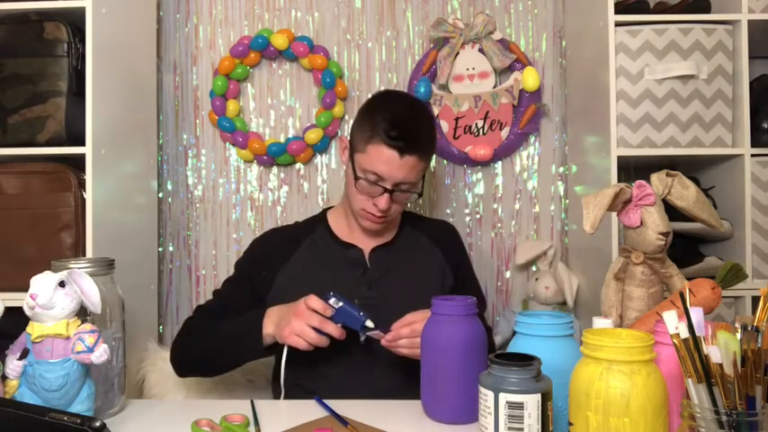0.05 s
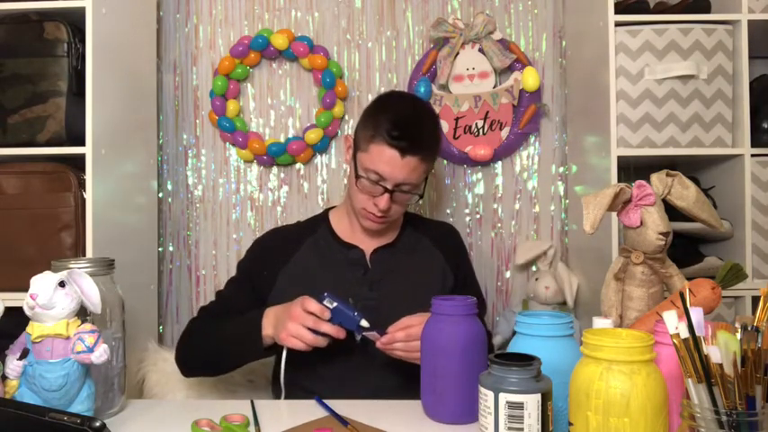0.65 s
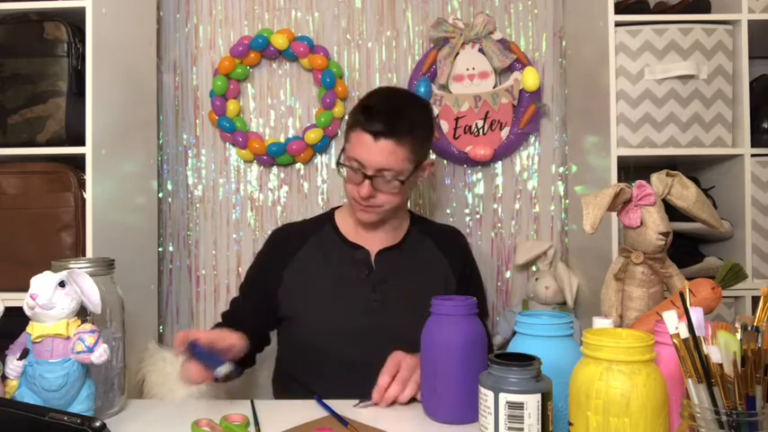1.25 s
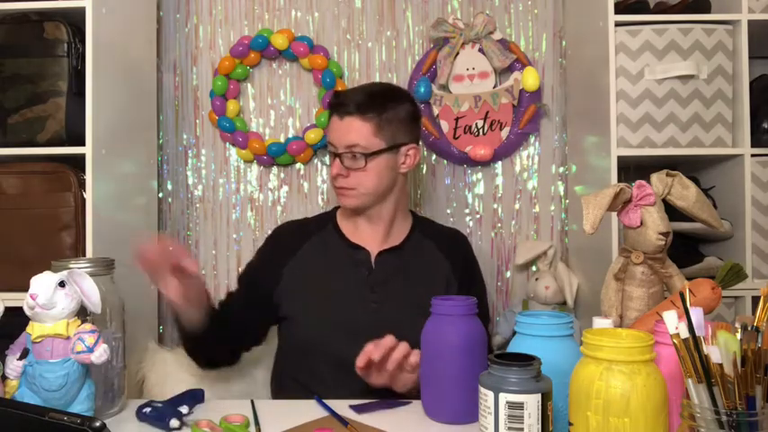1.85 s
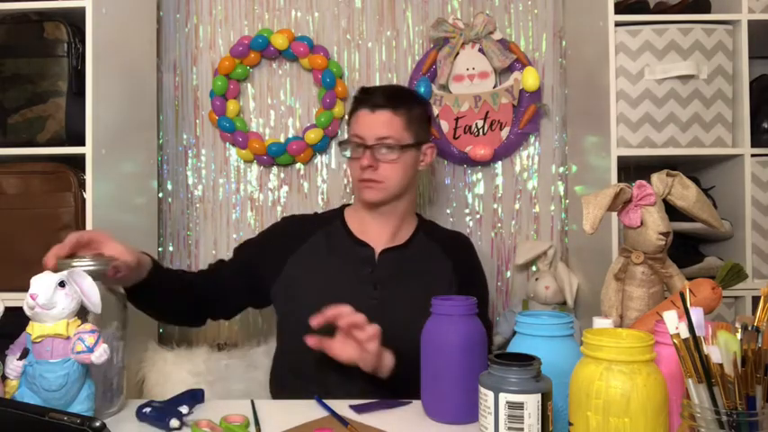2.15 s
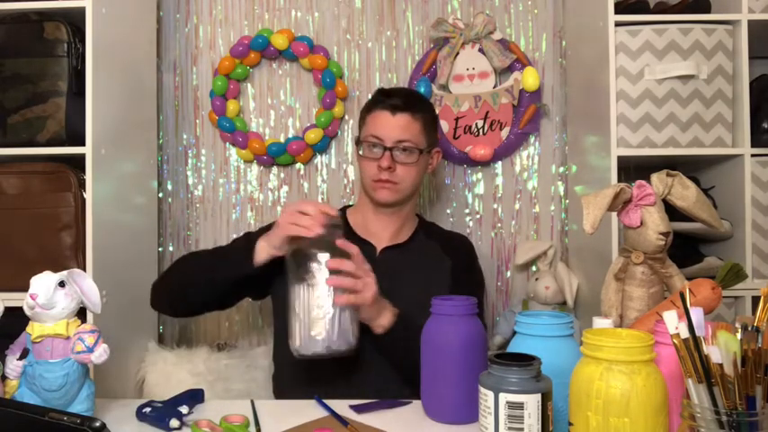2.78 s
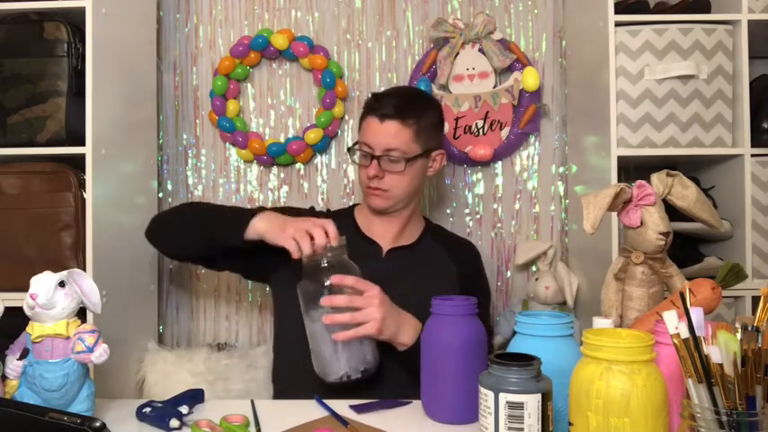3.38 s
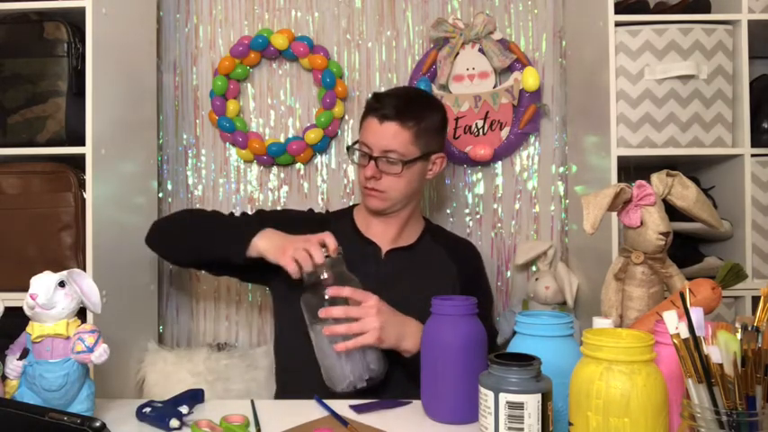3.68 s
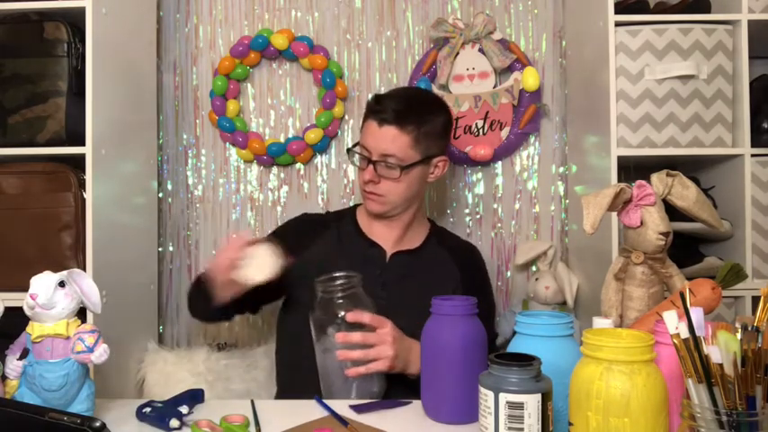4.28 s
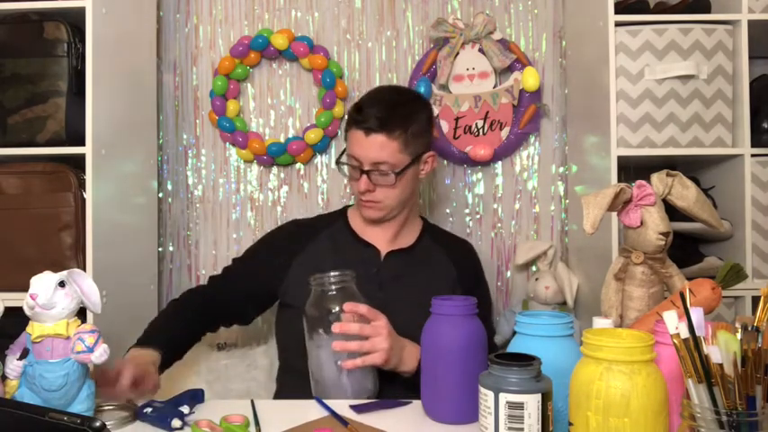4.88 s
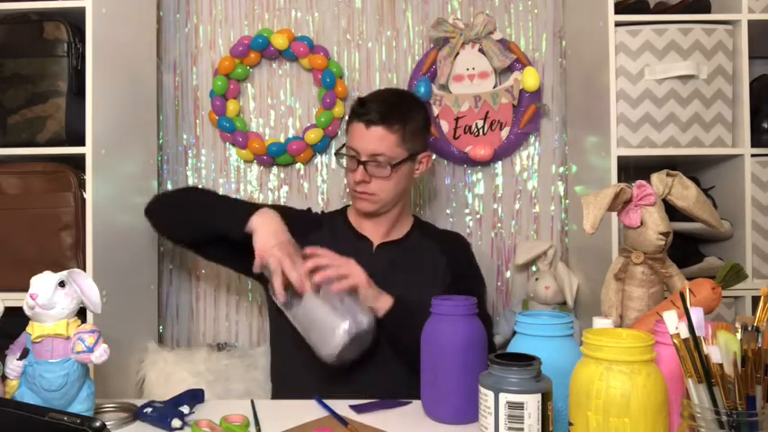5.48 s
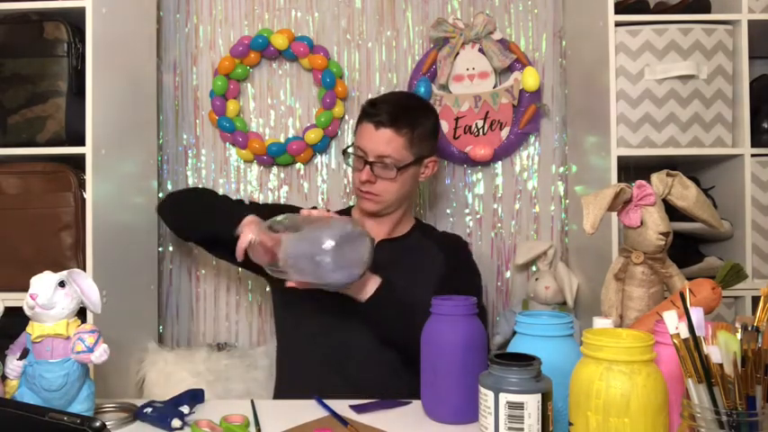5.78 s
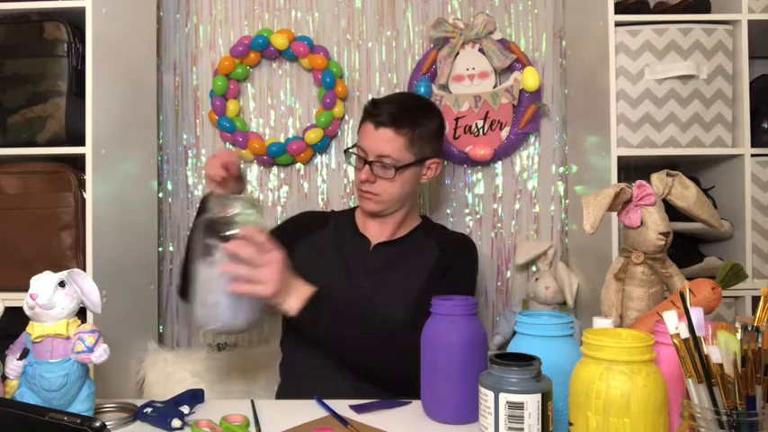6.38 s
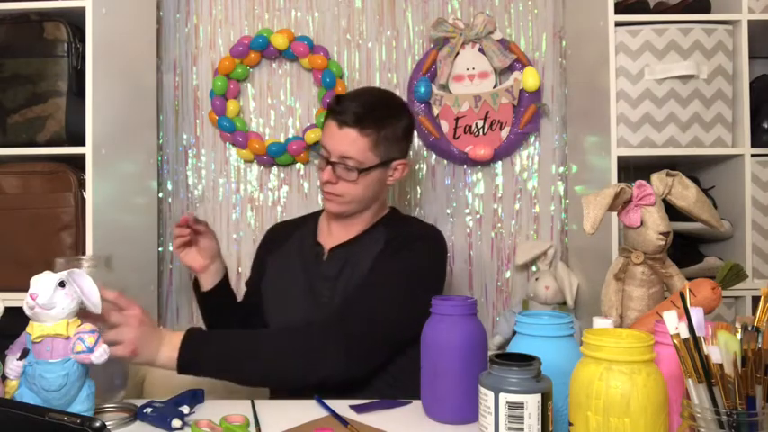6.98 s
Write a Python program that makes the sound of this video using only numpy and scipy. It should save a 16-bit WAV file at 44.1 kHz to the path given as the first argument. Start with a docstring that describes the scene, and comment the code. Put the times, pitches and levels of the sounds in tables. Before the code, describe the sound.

A quick clatter of plastic makes a tabletop ring as a glue gun is put down. Next comes the light metallic scrape of a band spinning off a glass jar, followed by clinks and hollow pops as the lid comes free. The metal lid chatters to rest on the table, fingertips softly squeak, and the jar knocks down. The small room adds a short echo and a faint, steady hiss and hum.

```python
"""Glue gun and glass jar

In a small room, a plastic glue gun is put down and topples over, making the tabletop ring.
A big glass jar is picked up and its screw band is spun off, scraping in many tiny slips.
The lid is prised loose with clinks and hollow pops of the air inside, then rattles down on the table.
Fingers squeak on the glass and the jar is set down, all over a faint hiss and hum."""
import sys
import numpy as np
from scipy import signal
from scipy.fft import rfft, irfft
from scipy.io import wavfile
from scipy.ndimage import uniform_filter1d

SR = 44100
rng = np.random.default_rng(int(sys.argv[2]) if len(sys.argv) > 2 else 0)


def log_audio(samples):
    """Write samples as a 16-bit WAV file to the path given in sys.argv[1]."""
    # one column per channel
    frames = np.atleast_2d(samples).T
    # limit to full scale, then quantise
    limited = np.clip(frames, -1, 1)
    pcm = np.round(limited * 32767).astype(np.int16)
    wavfile.write(sys.argv[1], SR, pcm)


N = 314913


def amp(db):
    """Turns decibels into a gain."""
    return 10 ** (np.asarray(db) / 20)


def unit_rms(x):
    """Scales x to an average power of one."""
    return x / np.sqrt(np.mean(x ** 2) + 1e-20)


def unit_energy(x):
    """Scales x to a total energy of one."""
    return x / np.sqrt(np.sum(x ** 2) + 1e-20)


def curve_at(points, hz):
    """Reads a curve between its frequency points."""
    point_hz, values = np.transpose(points)
    return np.interp(np.log(hz + 1), np.log(point_hz), values)


def add(mix, start_s, sound):
    """Mixes a sound in at its start time."""
    part = mix[round(start_s * SR):][:len(sound)]
    part += sound[:len(part)]


def fade(t, fade_s):
    """Dies away. A fade time is how long a sound takes to drop 60 dB."""
    return np.exp(-np.log(1000) * t / fade_s)


def colour(x, *curves, size=4096):
    """Shapes the tone of x by the sum of some dB curves."""
    hz = np.fft.rfftfreq(size, 1 / SR)
    gain = amp(sum(curve_at(curve, hz) for curve in curves))
    cepstrum = irfft(np.log(gain))
    cepstrum[1:size // 2] *= 2  # folded so that the filter never sounds early
    cepstrum[size // 2 + 1:] = 0
    response = irfft(np.exp(rfft(cepstrum)))[:size // 2]
    return signal.oaconvolve(x, response)[:len(x)]


def fade_by_band(x, fades):
    """Each frequency band dies at its own rate and keeps its share of the energy."""
    t = np.arange(len(x)) / SR
    hz, spectrum = np.fft.rfftfreq(len(x), 1 / SR), rfft(x)
    band_hz, fade_times = np.transpose(fades)
    out = np.zeros(len(x))
    for fade_s, pick in zip(fade_times, np.eye(len(fades))):
        share = curve_at(list(zip(band_hz, pick)), hz)
        band = irfft(spectrum * share, len(x))
        out += unit_energy(band * fade(t, fade_s)) * np.sqrt(share.mean())
    return unit_energy(out)


def ring(notes, size=16384):
    """An object rings with its own fading notes."""
    t = np.arange(size) / SR
    return unit_energy(sum(amp(db) * unit_energy(np.sin(2 * np.pi * hz * t) * fade(t, fade_s))
                           for hz, db, fade_s in notes))


def resonate(x, peaks):
    """Passes x through resonances side by side."""
    return sum(amp(db) * signal.lfilter(*signal.iirpeak(hz, hz / width, SR), x)
               for hz, width, db in peaks)


def swells(strokes, depth_db=35):
    """Each rubbing stroke climbs by depth_db in its rise time and drops as far in its fall time."""
    gain = np.zeros(N)
    for peak_s, db, rise_s, fall_s in strokes:
        t = np.arange(N) / SR - peak_s
        distance = t / np.where(t < 0, rise_s, fall_s)
        gain += amp(db - depth_db * np.minimum(distance ** 2, 10))
    return gain


def slips(per_s, spread_db):
    """Rubbing surfaces stick and let go in tiny, uneven jerks."""
    strength = amp(spread_db * np.minimum(rng.exponential(1, N), 4))
    return strength * rng.choice([-1, 1], N) * (rng.random(N) < per_s / SR)


def rubbed(strokes, notes, tone, per_s, spread_db, ring_db):
    """Tiny slips shake an object, which rings on after them."""
    friction = swells(strokes) * unit_rms(slips(per_s, spread_db))
    ringing = signal.oaconvolve(friction, ring(notes))[:N]
    return colour(friction + amp(ring_db) * ringing, tone)


def struck(blows, notes, tone, fades, tilt_hz, tick_db, ring_db, ping_db, mid_ping_s):
    """Each blow is a tick, a noisy burst, clear notes and a ping from the spot struck."""
    out = np.zeros(N)
    for start_s, db, bass_db, treble_db, ping_hz in blows:
        clear = ring([(hz, note_db + 2 * rng.standard_normal(), fade_s) for hz, note_db, fade_s in notes])
        blow = fade_by_band(rng.standard_normal(len(clear)), fades) + amp(ring_db) * clear
        tick = unit_energy(rng.standard_normal(96) * np.hanning(192)[96:])
        add(blow, 0, amp(tick_db) * tick)
        tilt = list(zip(tilt_hz, (bass_db, 0, treble_db)))  # harder contact, more treble
        blow = colour(unit_energy(blow), tone, tilt)
        ping = ring([(ping_hz, 0, mid_ping_s * np.sqrt(tilt_hz[1] / ping_hz))])  # low pings last longer
        add(out, start_s, amp(db) * (blow + amp(ping_db) * np.linalg.norm(blow) * ping))
    return out


# The tone of the hiss. Each row: frequency in Hz, relative level in dB.
HISS_TONE = [(12, -60), (20, -38), (41, -7.5), (64, -7.5), (83, -23.5), (112, -13), (185, -13.5),
             (245, -13.5), (298, -15), (416, -16), (534, -20), (649, -19.5), (1100, -26), (4550, -34),
             (15500, -43)]
def background(hiss_db=-69, hum_db=-69, hum_hz=58.3, waver=0.18, waver_hz=9):
    """A steady hiss and a low, wavering hum."""
    hiss = colour(rng.standard_normal(N), HISS_TONE)
    above_rumble = signal.sosfilt(signal.butter(4, 100, "high", fs=SR, output="sos"), hiss)
    hiss /= np.std(above_rumble)
    drift = signal.sosfilt(signal.butter(2, waver_hz, fs=SR, output="sos"), rng.standard_normal((2, N)))
    phase = 2 * np.pi * hum_hz * np.arange(N) / SR
    hum = (1 + waver * unit_rms(drift[0])) * np.sin(phase) + waver * unit_rms(drift[1]) * np.cos(phase)
    return amp(hiss_db) * hiss + amp(hum_db) * unit_rms(hum)


# Fingers brush what they hold. Each row: peak time in seconds, level in dB, rise and fall in seconds.
BRUSH_STROKES = [(1.19, -73, 0.15, .06), (2.47, -74, 0.11, 0.1), (5.16, -72.5, 0.077, 0.052),
                 (6.15, -75, 0.1, 0.091)]
def finger_brushes():
    """Skin rustles faintly as the grip shifts."""
    rustle = resonate(slips(per_s=1500, spread_db=3), [(2200, 740, 3), (3700, 2700, -4.5)])
    return swells(BRUSH_STROKES) * unit_rms(rustle)


# Glue gun, hand, lid and jar hit the table. Each row: start in seconds, relative level in dB,
# bass and treble in dB, ping pitch in Hz, level of the thud in dB compared with the knock.
TABLE_KNOCKS = [(1.323, -24.5, -19, -0.5, 1546, -4), (1.3305, -32.5, -7, -1.5, 1665, -11),
                (1.336, -27, -10, -16, 980, -9.5), (1.449, -54, 9.5, -18, 422, -10),
                (1.5181, -37, -8, -22, 456, -16), (1.529, -39, -4, 10.5, 4860, 7.5),
                (1.588, -48, 8, -5, 1490, -8), (1.6093, -30.5, -3.5, -19, 1600, -15.5),
                (1.615, -30, -8, -25, 717, -14), (1.646, -29, -14.5, -24.5, 1053, -17.5),
                (1.957, -54, -23, -10, 1500, -17), (1.9637, -47, -21, -3, 1360, -32),
                (1.994, -56, -6.5, -10.5, 1020, -8), (4.6147, -32, -25.5, -9, 1266, -25),
                (6.9196, -33, -2.5, -17, 1040, -27.5), (6.9257, -37.5, 9, -11, 327, -10),
                (6.949, -50, 22.5, -10, 342, -19)]
# The tabletop's own notes. Each row: pitch in Hz, relative level in dB, fade time in seconds.
TABLE_NOTES = [(151, 1, 0.19), (230.6, 1.5, 0.19), (264.8, -4, 0.39), (419.8, -2, 0.28), (462.3, 4, 0.055),
               (601, 0, 0.11), (746, -26.5, 0.27), (904, -14, 0.232), (1040, -13.5, 0.33),
               (1503, -1, 0.095), (1550, -10, 0.054), (3200, -10, 0.17), (4930, -11, 0.16)]
# The tone of a knock. Each row: frequency in Hz, boost or cut in dB.
TABLE_TONE = [(40, -12.5), (100, -13.5), (160, 1), (240, 9.5), (450, 9), (800, 9), (1600, 1.5),
              (2700, -5.5), (3400, -1.5), (4200, -7.5), (6300, -10), (9000, -23.5), (16000, -31)]
# How a knock's noisy burst dies. Each row: frequency in Hz, fade time in seconds.
TABLE_FADES = [(200, 0.33), (600, 0.098), (1500, 0.031), (4000, 0.05), (12000, 0.024)]
def table_knocks(settle_s=0.0115, thud_bass_db=-1.5, thud_treble_db=-25, thud_hz=428, lowest_hz=112):
    """Things knock, then thud as their weight comes down. The deepest bass is cut away."""
    contacts = [row[:-1] for row in TABLE_KNOCKS]
    thuds = [(start_s + settle_s, db + thud_db, thud_bass_db, thud_treble_db, thud_hz)
             for start_s, db, *_, thud_db in TABLE_KNOCKS]
    knocks = struck(contacts + thuds, TABLE_NOTES, TABLE_TONE, TABLE_FADES, tilt_hz=(380, 2000, 4000),
                    tick_db=-10, ring_db=-15.5, ping_db=-3.5, mid_ping_s=0.028)
    return amp(32) * signal.sosfilt(signal.butter(4, lowest_hz, "high", fs=SR, output="sos"), knocks)


# Hollow pops. Each row: start in seconds, relative level in dB, pitch in Hz, fade time in seconds.
AIR_POPS = [(2.035, -51, 240, 0.17), (3.671, -20.5, 240, 0.11), (3.70, -32.5, 295.3, 0.19),
            (3.798, -30.5, 279, .08), (3.821, -13, 290.7, 0.081), (3.882, -41, 300, .12),
            (4.045, -50, 302, 0.2), (4.134, -47.5, 327.5, 0.16), (5.11, -42.5, 310, 0.071),
            (5.265, -44.5, 282.5, 0.077), (6.923, -28.5, 241.4, 0.11), (6.986, -41.5, 274, 0.23)]
# Rubbing the rim makes the air sing.
# Each row: peak time in seconds, level in dB, rise and fall in seconds, pitch in Hz.
AIR_SINGING = [(2.285, -69, 0.036, .04, 724), (3.745, -45, 0.074, .16, 699), (3.822, -36, .04, 0.022, 735),
               (4.135, -46.5, 0.02, 0.037, 682)]
def jar_air(rise_s=0.0068, roughness=0.17):
    """The air in the jar pops and sings. Its pitch depends on how far the mouth is covered."""
    pops, t = np.zeros(N), np.arange(16384) / SR
    onset = 1 - np.exp(-t / rise_s)
    for start_s, db, hz, fade_s in AIR_POPS:
        add(pops, start_s, amp(db) * np.sin(2 * np.pi * hz * t) * onset * fade(t, fade_s))
    singing = sum(swells([stroke]) * np.sin(2 * np.pi * hz * np.arange(N) / SR)
                  for *stroke, hz in AIR_SINGING)
    judder = unit_rms(uniform_filter1d(rng.standard_normal(N), size=200))  # the lid drags unevenly
    return amp(5) * pops + (1 + roughness * judder) * singing


# Fingertips slip. Each row: start in seconds, level in dB, length in seconds, pitch in Hz.
FINGER_SQUEAKS = [(2.488, -57.5, 0.022, 2450), (5.597, -61.5, 0.037, 2465), (6.212, -55, 0.019, 3093),
                  (6.554, -60.5, 0.029, 2090), (6.575, -55.5, 0.017, 2485), (6.58, -54.5, 0.03, 3574)]
# Resonances of rubbed glass. Each row: frequency in Hz, width in Hz, boost in dB.
GLASS_PEAKS = [(2120, 166, 13.5), (2520, 160, 12.5), (3020, 260, 7.5), (3550, 510, 6), (5420, 450, 2)]
def finger_squeaks(waver=0.0085, scuff_db=-1):
    """Slipping skin squeaks at one wavering pitch and scuffs the glass wall."""
    out = np.zeros(N)
    scuff = resonate(resonate(slips(per_s=2700, spread_db=0), GLASS_PEAKS), GLASS_PEAKS)
    drift = unit_rms(uniform_filter1d(rng.standard_normal(N), size=150))
    for start_s, db, length_s, hz in FINGER_SQUEAKS:
        span = slice(round(start_s * SR), round((start_s + length_s) * SR))
        pitch_hz = hz * (1 + waver * drift[span])
        whistle = np.sin(2 * np.pi * np.cumsum(pitch_hz) / SR)
        squeak = unit_rms(whistle + amp(scuff_db) * unit_rms(scuff[span]))
        add(out, start_s, amp(db) * squeak * np.hanning(len(squeak)))
    return out


# The band is gripped and forced, then flicked up the thread and left to coast.
# Each row: peak time in seconds, relative level in dB, rise and fall in seconds.
GRIP_STROKES = [(2.687, -58, 0.02, .04), (2.73, -55, 0.052, .16), (2.905, -53, 0.078, 0.04)]
SPIN_STROKES = [(2.94, -39.5, 0.12, 0.054), (2.943, -37.5, 0.021, 0.024), (2.985, -38.5, 0.05, 0.058),
                (3.19, -62.5, 0.2, .22)]
# Resonances of the spinning band. Each row: frequency in Hz, width in Hz, boost or cut in dB.
BAND_PEAKS = [(2260, 89, 7), (3040, 230, 4.5), (3830, 470, 1), (5550, 1700, 8), (7100, 370, 11.5),
              (8940, 580, -5), (10900, 590, -1), (14500, 2500, -24)]
def screw_band(scuff_db=-22, ring_db=-8):
    """The band grinds dully on the glass, then spins freely, its thin metal ringing like the lid."""
    glass = resonate(slips(per_s=870, spread_db=1), GLASS_PEAKS)
    grind = unit_rms(resonate(glass, [(2220, 4300, 2), (4540, 5900, -28)]))
    thread = slips(per_s=2200, spread_db=1.5)
    scrape = unit_rms(resonate(thread, BAND_PEAKS) + amp(scuff_db) * colour(thread, LID_TONE))
    ringing = unit_rms(signal.oaconvolve(scrape, ring(LID_NOTES))[:N])
    spin = unit_rms(scrape + amp(ring_db) * ringing)
    return amp(2) * swells(GRIP_STROKES) * grind + amp(-5.5) * swells(SPIN_STROKES) * spin


# Lid and band hit the jar's mouth; the last rows are the glass clinking as the jar is set down. # Each row:
# start in seconds, relative level in dB, bass and treble in dB, ping pitch in Hz.
RIM_CLINKS = [(2.716, -43, -5.5, -13, 2300), (2.829, -55.5, 1, 7, 5300), (3.121, -54.5, -19, 4, 7100),
              (3.1375, -46, -10, 10.5, 2240), (3.141, -46.5, -18, 6.5, 6130), (3.214, -54.5, -9, -5, 3900),
              (3.674, -42.5, 17.5, -1, 574), (3.687, -42, 8.5, 4.5, 3810), (3.789, -37, -7.5, -2, 4000),
              (3.797, -31.5, -4.5, 9, 6340), (3.8185, -20.5, -8, 3, 3710), (3.825, -26.5, 8, 4.5, 2080),
              (4.044, -39.5, -6, 1, 3640), (4.0795, -34, -27.5, 0, 4160), (4.1026, -23.5, -11, -5, 3995),
              (4.139, -36.5, -9.5, 6.5, 2042), (6.926, -57, 2, 17, 6920), (7.013, -43.5, -1, 0, 5270),
              (7.02, -41.5, -1, 1, 4200)]
# The jar's own notes. Each row: pitch in Hz, relative level in dB, fade time in seconds.
JAR_NOTES = [(682, -11, 0.29), (1950, -13.5, 0.2), (2075, 5, 0.15), (2110, -1.5, .14), (3130, -13, .25),
             (3474, 4, 0.073), (3740, -9, 0.069), (3920, -10.5, 0.18), (4250, -6, 0.1), (4495, -2, .17),
             (5050, -10.5, 0.1585), (5450, -10.5, .12), (7200, -7, 0.15), (8270, -9.5, 0.17),
             (10200, -3, .15)]
# The tone of a clink. Each row: frequency in Hz, boost or cut in dB.
JAR_TONE = [(60, -34), (180, -8.5), (400, 4), (700, 1.5), (1000, -5.5), (2000, 1), (2600, -4.5), (3900, 2),
            (5300, -4.5), (7000, -6), (10000, -13), (16000, -15)]
# How the noisy burst of a metal tap dies. Each row: frequency in Hz, fade time in seconds.
METAL_FADES = [(300, 0.07), (2000, .06), (4000, 0.072), (12000, .04)]
def jar_clinks(coast_start_s=3.274, turn_s=0.084, turn_loss_db=4):
    """Metal clinks on the glass rim, the glass clinks as the jar is set down, and the loose band ticks once a
    turn, ever softer."""
    ticks = [(coast_start_s + turn_s * turn, -58.5 - turn_loss_db * turn, -1.5, 5, 7100)
             for turn in range(3)]  # same columns as RIM_CLINKS
    clinks = struck(list(RIM_CLINKS) + ticks, JAR_NOTES, JAR_TONE, METAL_FADES, tilt_hz=(600, 3000, 8000),
                    tick_db=-5.5, ring_db=-13, ping_db=-3.5, mid_ping_s=0.026)
    return amp(27.5) * clinks


# The lid drags on the rim; later the jar's base slides into place.
# Each row: peak time in seconds, relative level in dB, rise and fall in seconds.
RIM_DRAGS = [(3.682, -47.5, 0.045, 0.074), (3.81, -55.5, 0.3, .15), (3.822, -29, 0.028, 0.021),
             (4.03, -59.5, 0.13, .07), (4.12, -41.5, 0.058, 0.096)]
BASE_SLIDE = [(7.03, -49, 0.035, 0.17)]
def jar_scrapes():
    """Scraping at the rim or the base sets the glass ringing."""
    drag = rubbed(RIM_DRAGS, JAR_NOTES, JAR_TONE, per_s=2600, spread_db=6.5, ring_db=-10)
    slide = rubbed(BASE_SLIDE, JAR_NOTES, LID_TONE, per_s=3100, spread_db=3.5, ring_db=-20)
    return amp(2.5) * drag + amp(-2.5) * slide


# The lid rolls before it tips. Each row: peak time in seconds, level in dB, rise and fall in seconds.
ROLL_STROKES = [(4.622, -43.5, 0.015, 0.045), (4.67, -54, .06, 0.16)]
# Resonances of the rolling lid. Each row: frequency in Hz, width in Hz, boost in dB.
RUMBLE_PEAKS = [(970, 180, 2.5), (1215, 360, 1)]
def lid_roll():
    """The lid's edge rumbles hollowly over the tabletop."""
    rumble = resonate(resonate(slips(per_s=1200, spread_db=-1), RUMBLE_PEAKS), RUMBLE_PEAKS)
    return swells(ROLL_STROKES) * unit_rms(rumble)


# The lid taps the table.
# Each row: start in seconds, relative level in dB, bass and treble in dB, ping pitch in Hz.
LID_TAPS = [(4.735, -44.5, 3, -0.5, 1910), (4.747, -46.5, -2, 12, 3950), (4.771, -52, -2, 9, 2590),
            (4.7895, -32.5, -9.5, -1.5, 1870), (4.799, -49.5, 0, -16, 1950), (4.8418, -42.5, 0.5, 9, 3645),
            (4.868, -49, 10, 14.5, 2005)]
# The lid chatters. Each row: peak time in seconds, relative level in dB, rise and fall in seconds.
LID_CHATTER = [(4.765, -46, 0.078, 0.14), (4.85, -52.5, 0.08, 0.13)]
# The lid's own notes. Each row: pitch in Hz, relative level in dB, fade time in seconds.
LID_NOTES = [(938, -15, 0.17), (1068, 1, 0.04), (1852, -20, 0.14), (2032, -16, 0.17), (3640, 3, 0.056),
             (3980, 4, 0.14), (4800, -41, 0.08), (7100, 10, 0.056), (6960, -13, 0.039), (9100, 8, 0.073),
             (10300, 17, .07), (11800, -10, 0.073)]
# The tone of a tap. Each row: frequency in Hz, boost or cut in dB.
LID_TONE = [(60, -18), (250, -3), (480, 2), (1100, 3), (1900, 9.5), (2700, -7.5), (3800, 2), (5500, -8.5),
            (7000, -5), (10000, -14.5), (16000, -17.5)]
def lid_rattle():
    """The metal lid tips over, then rocks and chatters to rest, muffled by the hand."""
    taps = struck(LID_TAPS, LID_NOTES, LID_TONE, METAL_FADES, tilt_hz=(1100, 2200, 8000),
                  tick_db=-8, ring_db=-10.5, ping_db=-3, mid_ping_s=0.034)
    chatter = rubbed(LID_CHATTER, LID_NOTES, LID_TONE, per_s=1200, spread_db=2.5, ring_db=-5.5)
    return amp(31) * taps + amp(1) * chatter


# How the room's echo dies. Each row: frequency in Hz, fade time in seconds.
ROOM_FADES = [(150, 0.39), (400, 0.27), (1000, 0.29), (3000, .31), (7000, 0.26), (14000, 0.096)]
def room(x, echo_db, first_echo_s=0.0054, echoes_per_s=4000, size=24000):
    """Sound bounces off shelves and walls, adding a short tail of echoes."""
    echoes = rng.choice([-1., 1.], size) * (rng.random(size) < echoes_per_s / SR)
    tail = np.zeros(size)
    add(tail, first_echo_s, fade_by_band(echoes, ROOM_FADES))
    return x + amp(echo_db) * signal.oaconvolve(x, tail)[:N]


def scene():
    """Jar, table and lid in one small room, over the hiss and hum."""
    handling = jar_clinks() + jar_scrapes() + screw_band() + finger_squeaks() + finger_brushes()
    mix = room(handling, echo_db=-7.5)
    mix += room(jar_air(), echo_db=-11.5)
    mix += room(table_knocks(), echo_db=-8.5)
    mix += room(lid_rattle() + lid_roll(), echo_db=-4.5)
    return (mix + background())[None]


def record(dry):
    """Cuts the treble above 16000 Hz."""
    low_pass = signal.firwin(511, 16000, window=("kaiser", 9), fs=SR)
    return signal.oaconvolve(dry, low_pass[None], "same")


dry = scene()
out = record(dry)
log_audio(out)
```